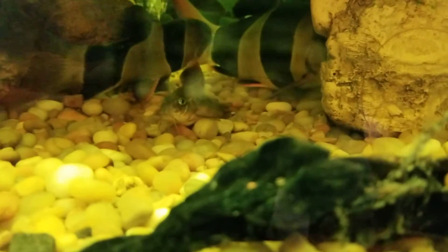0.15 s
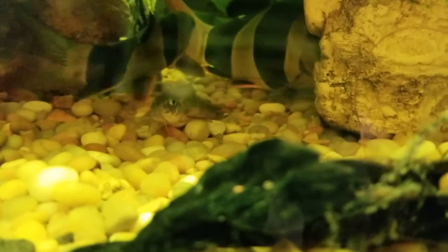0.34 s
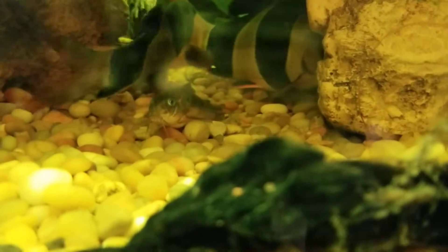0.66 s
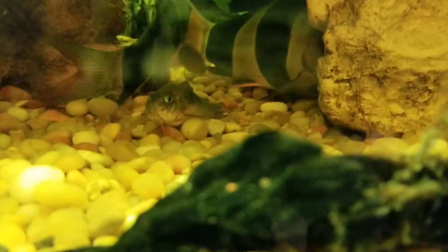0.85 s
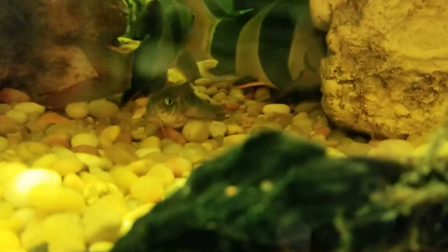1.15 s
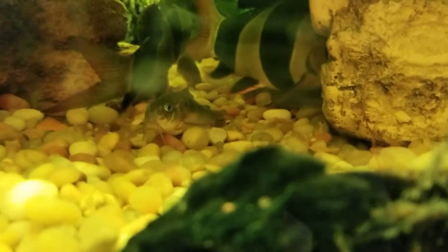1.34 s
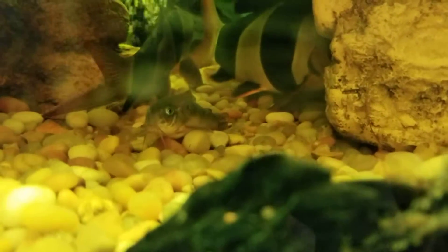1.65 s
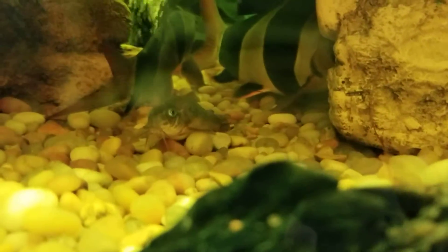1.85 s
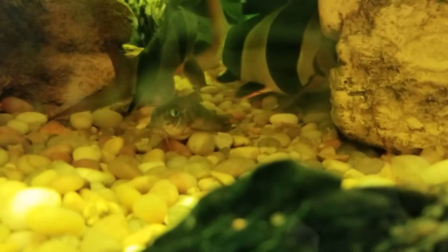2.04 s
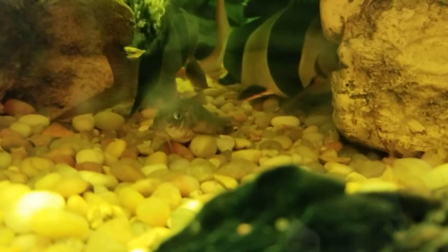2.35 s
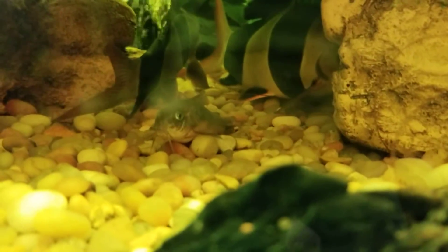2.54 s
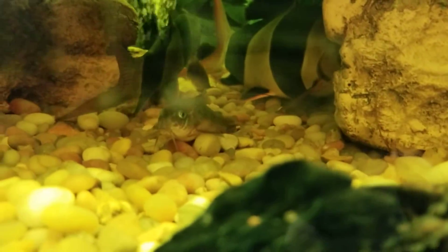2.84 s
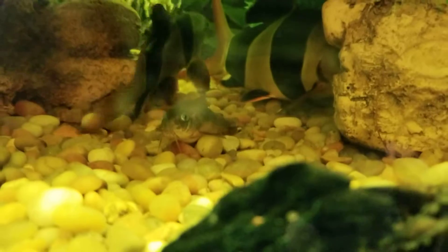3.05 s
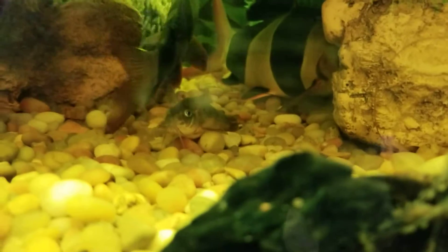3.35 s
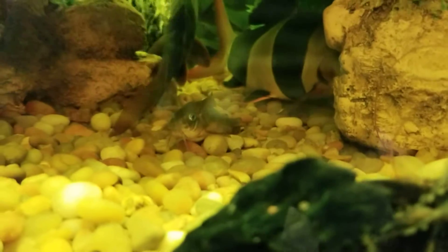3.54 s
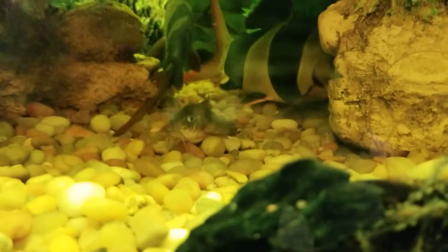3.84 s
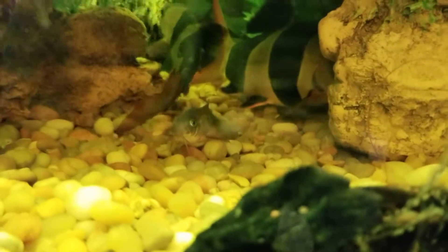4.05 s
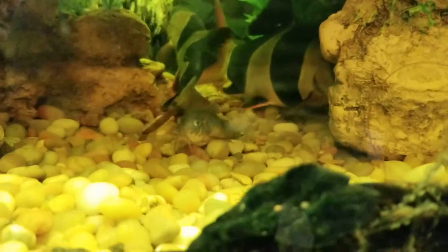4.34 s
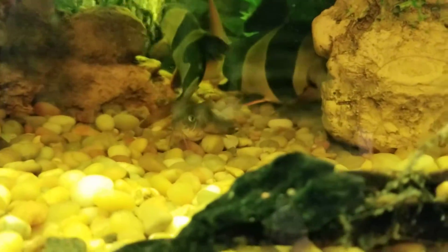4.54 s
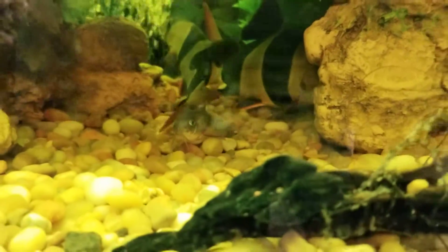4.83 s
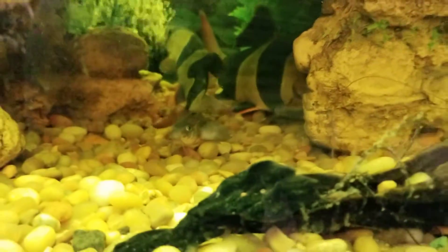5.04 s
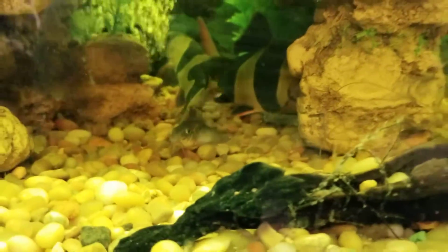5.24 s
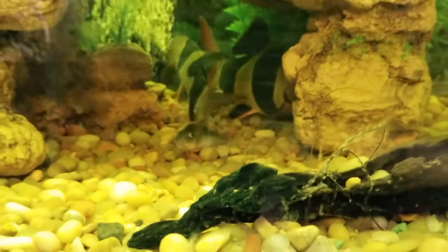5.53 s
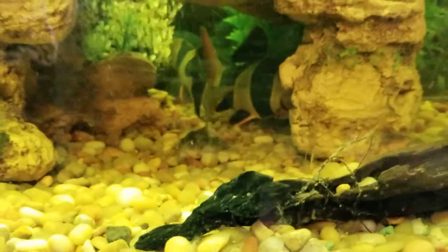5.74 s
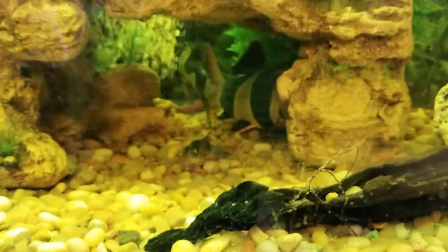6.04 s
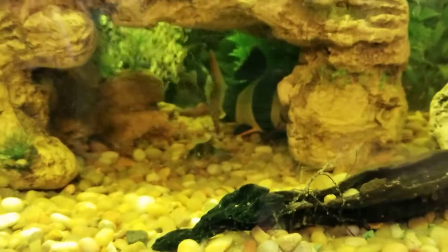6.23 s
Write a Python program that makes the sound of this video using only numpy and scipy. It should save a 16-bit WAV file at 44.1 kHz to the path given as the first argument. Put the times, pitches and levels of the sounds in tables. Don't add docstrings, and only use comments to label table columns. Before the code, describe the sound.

Beside an indoor fish tank, a low steady pump hum and bubbly air hiss continue, with a few tiny clicks from the microphone.

```python
import sys
import numpy as np
from scipy import signal
from scipy.fft import irfft, next_fast_len
from scipy.io import wavfile
from scipy.ndimage import uniform_filter1d

SR = 44100
rng = np.random.default_rng(int(sys.argv[2]) if len(sys.argv) > 2 else 0)


def gain_from_db(level_db):
    decades = np.asarray(level_db, float) / 20
    return 10 ** decades


def materialize(psi):
    bounded = np.clip(np.atleast_2d(psi).T, -1, 1)
    quanta = np.round(bounded * 32767).astype(np.int16)
    wavfile.write(sys.argv[1], SR, quanta)


N = 281602
MAINS_HZ = 59.983

# frequency in Hz, likeness from -1 to 1.
SAME = [(60, 0.9), (130, 0.87), (290, 0.9), (400, 0.75), (640, 0.73), (730, 0.12), (900, -0.12),
        (1400, -0.35), (2200, 0.25), (3000, -0.036), (15000, -0.03)]
# frequency in Hz, left minus right in dB.
BALANCE = [(60, 0.0), (110, 2), (200, 1.5), (380, 1), (700, 1.5), (1290, -0.5), (2380, -0.5), (4400, -2.0),
           (8120, -2), (15000, 0.5)]
# time in seconds, coupling in dB.
COUPLING = [(0, -2), (.4, -1), (1.1, -0.5), (1.55, -0.9), (2.2, 1.5), (3.0, 0), (3.9, -0.5), (4.7, 0.2),
            (5.4, -2), (6.39, -2.5)]
# time in seconds, change of the glass echo path in cm.
PATH = [(0.0, 0.0), (0.6, -0.39), (0.95, -1.15), (1.6, -0.95), (2.6, -0.68), (3.1, -0.31), (3.5, 0.01),
        (4.0, 0.01), (4.6, 0.25), (4.85, 1.11), (5.05, 1.74), (5.4, 2.2), (5.8, 3.36), (6.39, 3.9)]


def evened(x):
    return x / np.sqrt(np.mean(abs(x) ** 2) + 1e-20)


def read(points, hz):
    f, value = np.transpose(points)
    return np.interp(np.log(hz + 1), np.log(f + 1), value)


def columns(rows):
    s, *values = np.transpose(rows)
    return [np.interp(np.arange(N) / SR, s, v) for v in values]


def drift(top_hz, count):
    t = np.arange(0, N + 441, 441) / SR
    hz, turn = rng.uniform(-1, 1, (2, count, 24, 1))
    slow = np.exp(2j * np.pi * (top_hz * hz * t + turn)).sum(1) / np.sqrt(24)
    return [np.interp(np.arange(N) / SR, t, row) for row in slow]


def two_ports(same, lead=0):
    def make(a, b, c, d):
        left, other = a + 1j * b, c + 1j * d
        return np.array([left, same * np.exp(-1j * lead) * left + np.sqrt(1 - same ** 2) * other])
    return make


def noise(shape_db, patchy_db, flicker_db):
    frames, hz = N // 256 + 5, np.fft.rfftfreq(1024, 1 / SR)
    a, b, c, d, patches = rng.standard_normal((frames, 513, 5)).T
    flicker = evened(uniform_filter1d(patches[0], size=3))
    patches = uniform_filter1d(patches, size=12, axis=0)
    patches = evened(uniform_filter1d(patches, size=12, axis=1))
    z = two_ports(np.clip(read(SAME, hz), -1, 1)[:, None])(a, b, c, d)
    z *= gain_from_db(shape_db(hz)[:, None] + patchy_db * patches + flicker_db * flicker)
    z *= gain_from_db(np.outer([.5, -.5], read(BALANCE, hz)))[:, :, None]
    return evened(signal.istft(z, nperseg=1024, noverlap=768)[1][:, :N])


def long_noise(shape_db):
    hz = np.fft.rfftfreq(next_fast_len(N), 1 / SR)
    z = two_ports(np.clip(read(SAME, hz), -1, 1))(*rng.standard_normal((len(hz), 4)).T)
    z *= gain_from_db(shape_db(hz) + np.outer([.5, -.5], read(BALANCE, hz)))
    return evened(irfft(z, next_fast_len(N))[:, :N])


def multiple(k):
    return np.sqrt(2) * np.exp(2j * np.pi * k * MAINS_HZ * np.arange(N) / SR)


def hum():
    # level in dB rms, share of the coupling followed.
    thump_levels = [(-41, 0.74), (-45, 1.2), (-52.5, 1.2)]
    # multiple of the mains rate, level in dB rms.
    upper_multiples = [(5, -64), (7, -60.5), (8, -67.5), (9, -65), (17, -73.5), (22, -75)]
    coupling_db = columns(COUPLING)[0]
    levels = [db + share * coupling_db for db, share in thump_levels]
    levels += [db for k, db in upper_multiples]
    beat_hz, beat_share = .74, .15
    beat = 1 + beat_share * np.exp(2j * np.pi * beat_hz * (np.arange(N) / SR - 2.42))
    levels[0] += 20 * np.log10(abs(beat))
    orders = [1, 2, 3] + [round(k) for k, db in upper_multiples]
    halves = np.array([[.5], [-.5]])
    out = np.zeros((2, N))
    for k, db, waver in zip(orders, levels, drift(0.61, count=len(orders))):
        ports = gain_from_db(read(BALANCE, k * MAINS_HZ) * halves)
        ports = ports * np.exp(1j * 0.073 * k * halves)
        lag = 1.1 * (k % 2 == 0) + .3 * waver.real / k
        out += (gain_from_db(db) * ports * np.exp(-1j * lag) * multiple(k)).real
    return out


def buzz():
    # frequency in Hz, level in dB rms.
    buzz_lines = [(4619, -84), (4678, -87), (4737, -88), (4797, -87), (4861, -85), (4920, -81), (4980, -80),
                  (5039, -82), (5098, -81), (5157, -73), (5340, -85), (5459, -83), (5518, -84), (5636, -85),
                  (5701, -83), (5760, -80), (5819, -87), (5879, -86), (5938, -86), (5997, -82), (6056, -83),
                  (6239, -84), (6298, -81), (6358, -86), (6417, -85), (6476, -83), (6541, -88), (6600, -82),
                  (6659, -85)]
    # multiple, direct level in dB rms, glass echo share,
    # glass echo delay in turns, wall echo delay in turns.
    strong_lines = [(86, -73.4, 0.24, 0.77, 0.09), (83, -82.3, 0.48, 0.05, 0.3),
                    (96, -84.3, 0.98, 0.3, 0.92), (105, -80.8, 0.82, 0.59, 0.22),
                    (82, -84.3, 0.98, 0.68, 0.97), (85, -87.0, 0.98, 0.87, 0.63),
                    (100, -82.8, 0.52, 0.61, 0.96), (110, -85.7, 0.98, 0.83, 0.61)]
    strong_pan_db = [-1.7, -9, -8, -7, -2.7, -4, -2.3, -5]
    weak_gain_db, strong_gain_db = 2.2, .6
    wall_speed, wall_share = -2.33, .53
    path_cm, sound_cm_per_s = columns(PATH)[0], 34300
    out = np.zeros((2, N))
    strong_orders = [row[0] for row in strong_lines]
    for hz, db in buzz_lines:
        k = round(hz / MAINS_HZ)
        if k not in strong_orders:
            fade = np.array(drift(0.403, count=2))
            out += gain_from_db(db + weak_gain_db) * (fade * multiple(k)).real
    for (k, db, share, glass, wall), pan_db in zip(strong_lines, strong_pan_db):
        turns = k * MAINS_HZ * path_cm / sound_cm_per_s
        echoes = 1 + share * np.exp(2j * np.pi * (turns + glass))
        echoes += wall_share * np.exp(2j * np.pi * (wall_speed * turns + wall))
        ports = 2 * np.array([[gain_from_db(pan_db)], [1]]) / (1 + gain_from_db(pan_db))
        out += gain_from_db(db + strong_gain_db) * ports * (echoes * multiple(k)).real
    return out


def rush(gulps_db):
    # frequency in Hz, level in dB per Hz.
    tube_spectrum = [(440, -17.5), (750, -2.5), (798, -5.5), (1030, -5.5), (1150, -4.5), (1290, -5.5),
                     (1410, -3.5), (1590, -5.5), (1770, -2), (2270, -17), (2600, -19.5), (3380, -46),
                     (5720, -120)]
    fizz_spectrum = [(1290, -30), (2200, -26), (2630, -1), (3680, 2.5), (4390, -2), (5000, -1), (5420, -1),
                     (6470, -1.5), (6850, -6), (6960, -10), (7890, -16.5), (8220, -30), (8600, -37),
                     (11200, -81), (18900, -120)]
    air_spectrum = [(4820, -54), (8200, -17.5), (9090, -15), (9590, -16), (9920, -9), (10500, -7.5),
                    (12600, -6.5), (15100, -9.5), (16000, -11)]
    # level in dB rms, share of coupling, share of flow, dB per cm of added glass echo path.
    layer_levels = [
        (-45, 0.89, 0.29, -0.04),
        (-55.5, -0.13, 0.45, -0.04),
        (-63.5, 0.18, 0.7, 0.53),
        (-74.5, 0.51, 0.56, 0.76),
    ]
    shaded_hz = [1350, 1950]
    coupling_db, flow_db, path_cm = columns(COUPLING)[0], air()[0], columns(PATH)[0]
    rumble_db, tube_db, fizz_db, air_db = [
        db + near * coupling_db + blown * flow_db + per_cm * path_cm
        for db, near, blown, per_cm in layer_levels]
    stroke = 1 + 0.04 * multiple(0.92).real
    out = gain_from_db(rumble_db) * long_noise(rumble_shape)

    tube = noise(lambda hz: read(tube_spectrum, hz), patchy_db=1.13, flicker_db=0.53)
    shade = signal.butter(4, shaded_hz, 'bandpass', fs=SR, output='sos')
    band = signal.sosfiltfilt(shade, tube)
    away = turned()
    tube = band * gain_from_db(-3.5 * away) + (tube - band) * gain_from_db(2.2 * away)
    out += gain_from_db(tube_db + 0.55 * gulps_db) * stroke * tube

    fizz = noise(lambda hz: read(fizz_spectrum, hz), patchy_db=1.1, flicker_db=0.24)
    out += gain_from_db(fizz_db + 0.68 * gulps_db) * stroke * fizz

    def air_shape(hz):
        return read(air_spectrum, hz) - 60 * (hz > 15720)

    return out + gain_from_db(air_db) * noise(air_shape, patchy_db=-0.8, flicker_db=0.3)


def rumble_shape(hz):
    # frequency in Hz, level in dB per Hz.
    rumble_spectrum = [(13, -26), (22, -13), (37, -18.5), (54, -4.5), (70, -5), (98, -8.5), (125, -7.5),
                       (162, -14.5), (191, -10), (367, -15), (419, -17.5), (544, -18.5), (673, -17),
                       (793, -32), (1100, -30), (1430, -57), (2420, -120)]
    # centre in Hz, width in Hz, height in dB.
    cabinet_rings = [(37.2, 14, 10), (159.3, 14, 6), (225.6, 21, 4.5), (341, 8.6, 0), (517, 69, 4.5),
                     (584, 9.1, 0.5), (665, 84, 1.5), (1025, 20, 7)]
    peaks = sum(db / (1 + (2 * (hz - centre_hz) / wide_hz) ** 2)
                for centre_hz, wide_hz, db in cabinet_rings)
    return read(rumble_spectrum, hz) + peaks - 10 * np.log10(1 + (29.0 / (hz + 1)) ** 6)


def air():
    # time in seconds, flow in dB, lean in dB.
    flow_curve = [(0, -1, -2), (.5, -2.5, -4), (1.0, -1, -3.5), (1.55, -1, -5.5), (2.1, 1.5, -3.5),
                  (2.5, 1, -2.5), (3.2, .5, -3.5), (3.7, 1, 3), (4.3, 1.5, 2), (4.8, .5, 2), (5.2, -2, 3),
                  (5.75, -1, -3), (6.0, -2, -1), (6.39, -1, -2)]
    # time in seconds, extra flow in dB, half length in seconds.
    air_surges = [
        (0.87, 2.5, 0.078),
        (1.76, 3, .05),
        (2.097, 2, .08),
        (2.93, 3, 0.032),
        (3.143, 2, 0.034),
        (3.74, -0.5, 0.042),
        (4.4, 1.5, 0.048),
    ]
    flow_db, lean_db = columns(flow_curve)
    t = np.arange(N) / SR
    for s, db, half in air_surges:
        flow_db = flow_db + db * np.exp(-.5 * ((t - s) / half) ** 2)
    return flow_db, lean_db


def turned():
    return np.clip(columns(PATH)[0] - 1.0, 0, 1)


def pipes(gulps_db):
    # pitch in Hz, width in Hz, level in dB, left-right likeness 0-1, left lead in radians.
    pipe_tones = [(1292, 31, -1, 0.74, 0), (1710, 21, -2.5, 0.72, 0), (1835, 68, 0, 0.3, 1.4),
                  (3720, 140, 2.5, 0.27, 3)]
    # level in dB rms, share of flow, share of lean, dB once turned away.
    pipe_blowing = [(-65.5, 0.85, .1, 1), (-63.5, 1.24, -0.97, 1), (-64, 1.6, 0.66, 3.5),
                    (-76.5, 0.85, 0.42, -5)]
    hz = np.fft.rfftfreq(next_fast_len(N), 1 / SR)
    out, (flow_db, lean_db), away = np.zeros((2, N)), air(), turned()
    for tone, (blow_db, blown, leaning, away_db) in zip(pipe_tones, pipe_blowing):
        centre_hz, wide_hz, db, same, lead = tone
        z = two_ports(np.clip(same, 0, 1), lead)(*rng.standard_normal((len(hz), 4)).T)
        resonance = 1 / (1 + ((hz - centre_hz) / wide_hz) ** 2)
        whistle = irfft(z * resonance, next_fast_len(N))[:, :N]
        level_db = db + blow_db + blown * flow_db + leaning * lean_db + away_db * away
        out += gain_from_db(level_db) * evened(whistle * gain_from_db(gulps_db))
    return out


def bubbles():
    # start in seconds, peak in dB, pitch in Hz.
    bubble_bursts = [
        (.105, -56, 3720),
        (.123, -59, 3650),
        (.128, -66, 6050),
        (.158, -59, 6130),
        (.217, -58, 5930),
        (.287, -59, 3720),
        (.315, -65, 5760),
        (1.159, -50, 700),
        (4.666, -41, 640),
    ]
    out, t = np.zeros(N), np.arange(2000) / SR
    for s, db, hz in bubble_bursts:
        swell = np.minimum(t / 0.0012, 1) * gain_from_db(db - 60 * t / 0.09)
        ring = swell * np.sin(2 * np.pi * hz * t * (1 + .3 * t))
        out[round(s * SR):round(s * SR) + len(t)] += ring
    return out * gain_from_db([[0.], [-1.5]])


def ticks():
    # time in seconds, peak in dB, treble share in dB, port (0 left, 1 right).
    tick_times = [(.548, -52, -5, 0), (.8758, -36, -14, 0), (.8764, -36, -14, 0), (.8769, -30.5, -13, 0),
                  (.8779, -33.5, -15, 0), (.87885, -27.5, -17, 0), (.8819, -43, -15, 0),
                  (1.1966, -44, -15, 0), (1.199, -36.5, -17, 0), (1.2027, -37, -19, 0), (4.55, -52, -8, 1),
                  (5.7393, -56, 3, 1), (5.7448, -38, -7, 1), (5.749, -52, -14, 1), (5.7528, -50, -12, 1)]
    # pitch in Hz, level in dB, half length in seconds.
    shell_rings = [(5450, 0, .0002), (2200, -10, .0001), (8300, -22, .0001)]
    port_rings = [(10900, 0, .0002), (13800, -1, .0001)]
    out, t = np.zeros((2, N)), np.arange(-60, 61) / SR
    for s, db, treble_db, port in tick_times:
        modes = shell_rings + [(hz * 1.13 ** port, d + treble_db, half) for hz, d, half in port_rings]
        snap = sum(gain_from_db(d) * np.exp(-.5 * (t / half) ** 2) * np.cos(2 * np.pi * hz * t)
                   for hz, d, half in modes)
        middle = round(s * SR)
        out[round(port), middle - 60:middle + 61] += gain_from_db(db) * snap
    return out + gain_from_db(-44) * out[::-1]


def bumps():
    # time in seconds, peak in dB, pitch in Hz, half length in seconds.
    hand_pushes = [
        (.36, -43, 46, .035),
        (2.4, -46, 48, .03),
    ]
    t = np.arange(N) / SR
    return sum(gain_from_db(db) * np.exp(-.5 * ((t - s) / half) ** 2) * np.sin(2 * np.pi * hz * (t - s))
               for s, db, hz, half in hand_pushes)


def scene():
    gulps_db = 1.57 * np.sqrt(2) * drift(35., count=1)[0].real
    return hum() + buzz() + rush(gulps_db) + pipes(gulps_db) + bubbles() + ticks() + bumps()


def roll_off(x):
    return signal.sosfilt(signal.butter(12, 16500, fs=SR, output="sos"), x)


def record(dry):
    start = np.minimum(np.arange(N) / SR / .002, 1)
    dry = signal.sosfiltfilt(signal.butter(12, 16300, fs=SR, output='sos'), dry)
    return roll_off(dry * start)


dry = scene()
out = record(dry)
materialize(out)
```